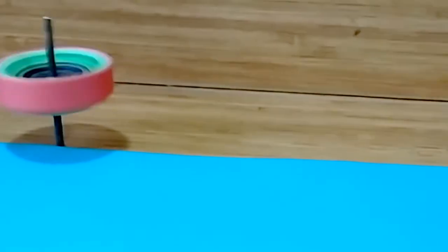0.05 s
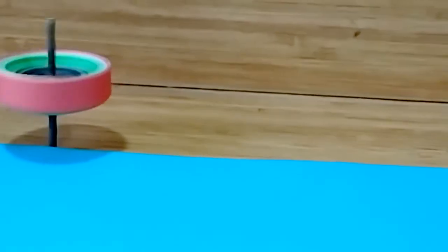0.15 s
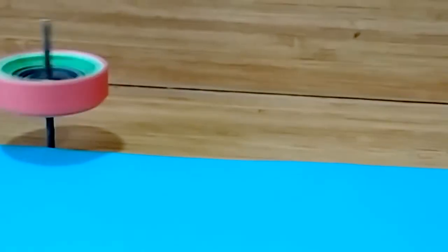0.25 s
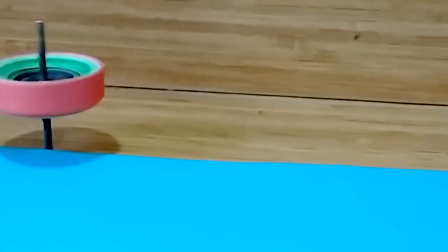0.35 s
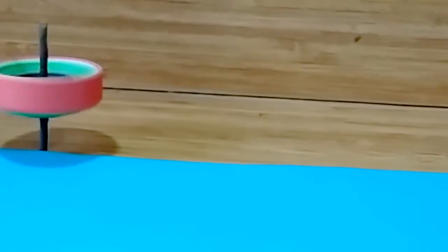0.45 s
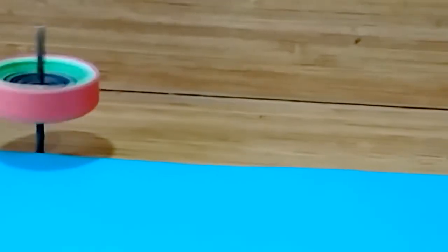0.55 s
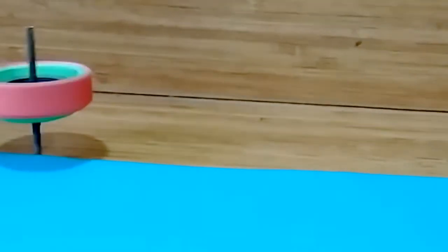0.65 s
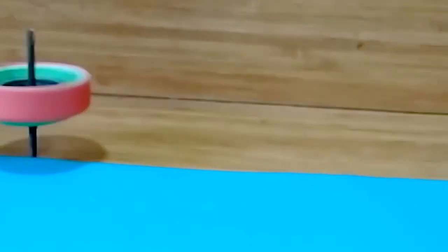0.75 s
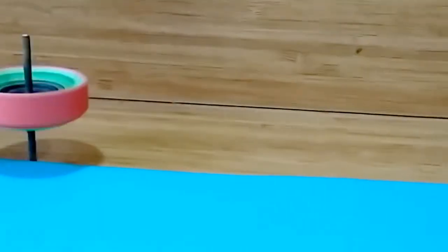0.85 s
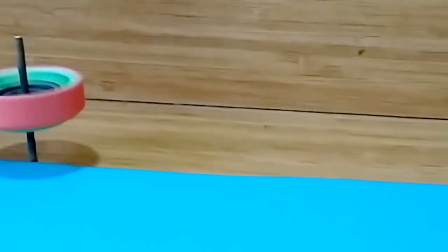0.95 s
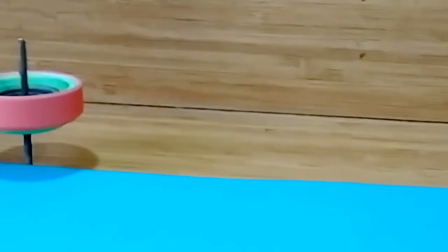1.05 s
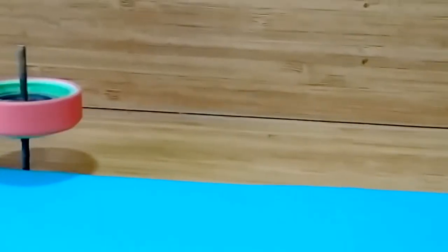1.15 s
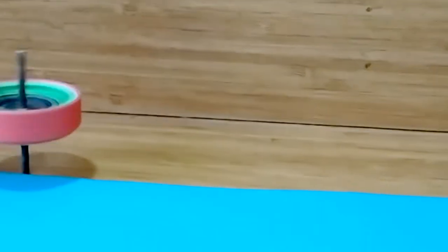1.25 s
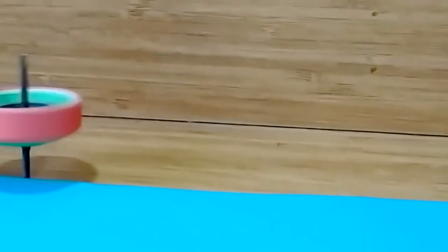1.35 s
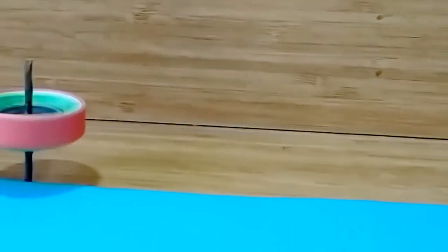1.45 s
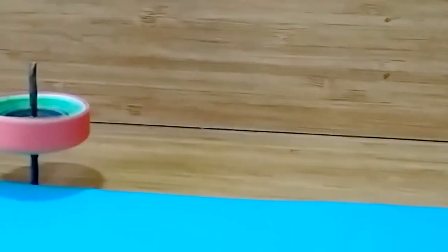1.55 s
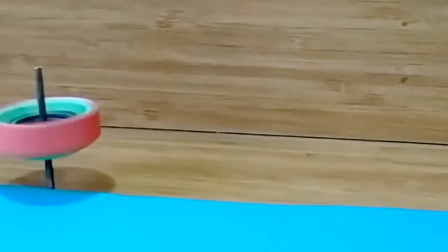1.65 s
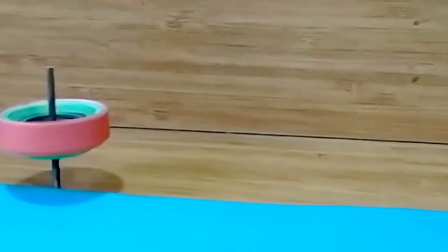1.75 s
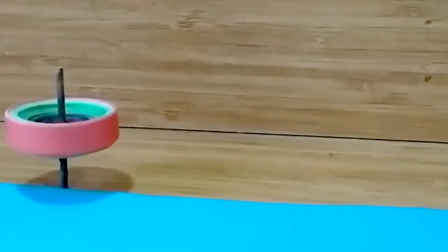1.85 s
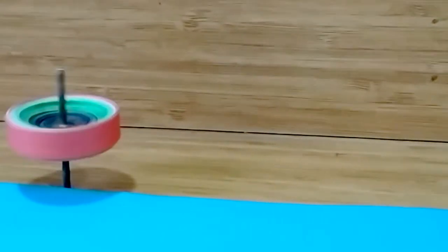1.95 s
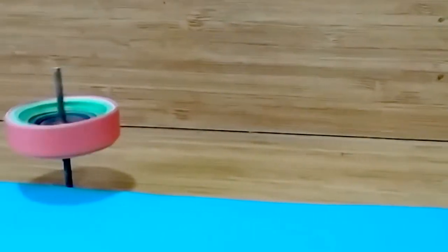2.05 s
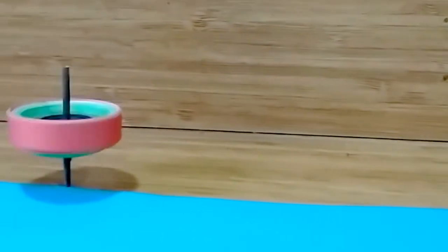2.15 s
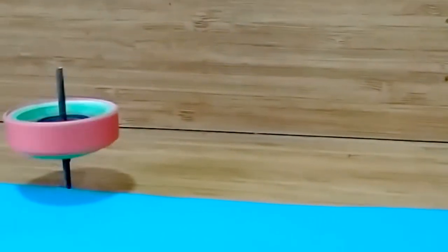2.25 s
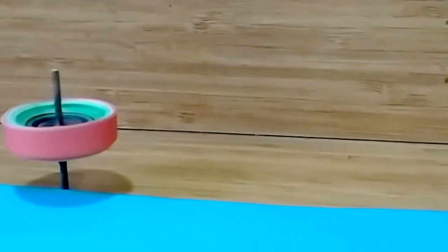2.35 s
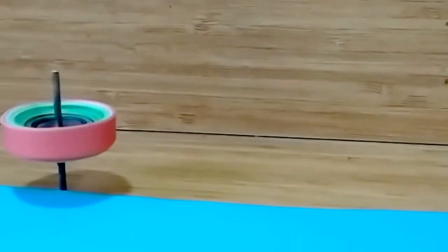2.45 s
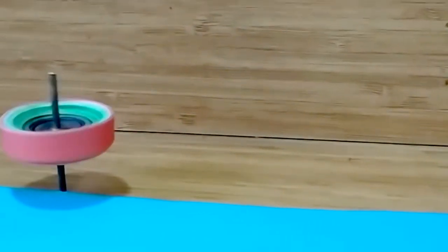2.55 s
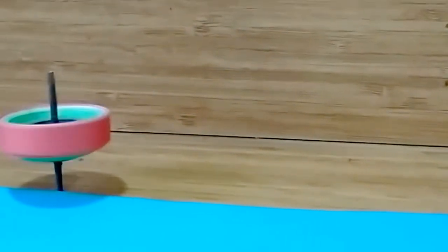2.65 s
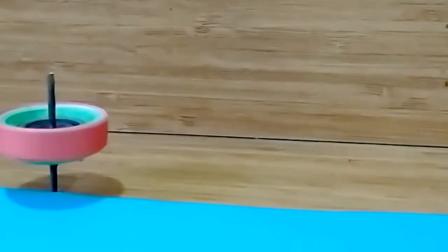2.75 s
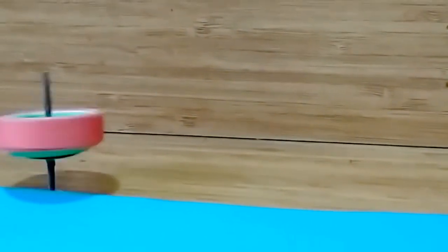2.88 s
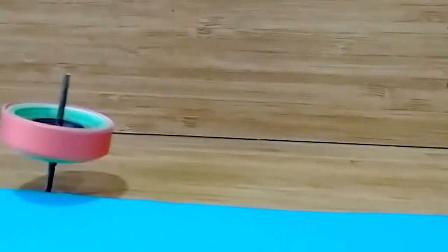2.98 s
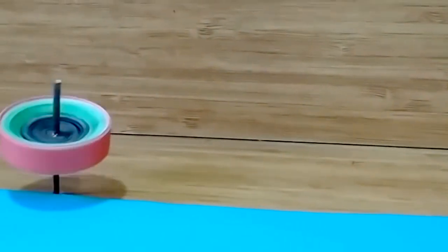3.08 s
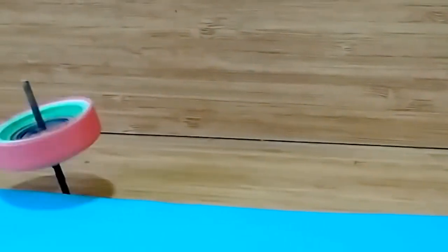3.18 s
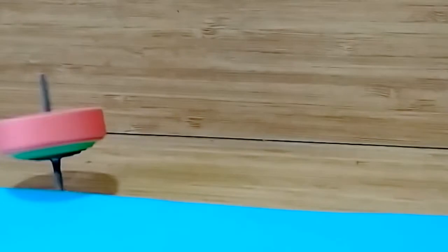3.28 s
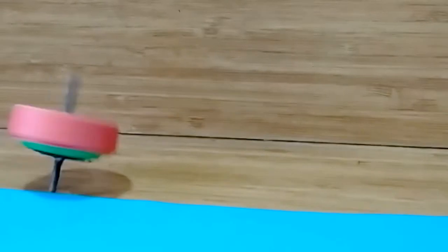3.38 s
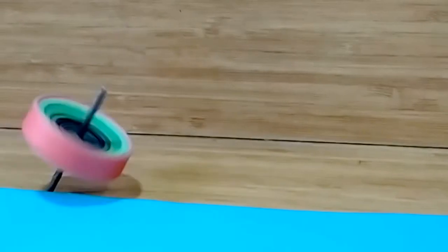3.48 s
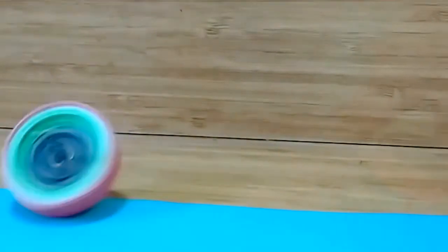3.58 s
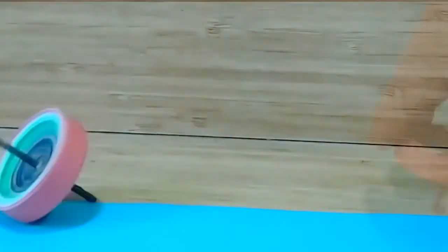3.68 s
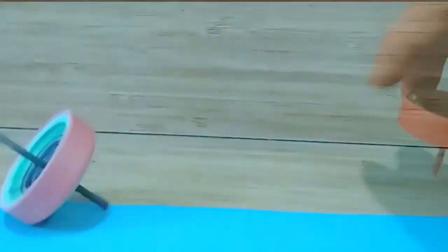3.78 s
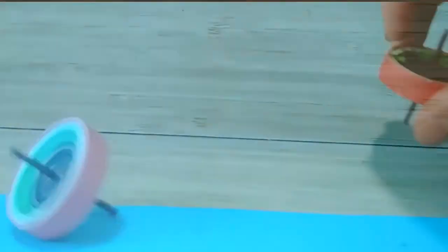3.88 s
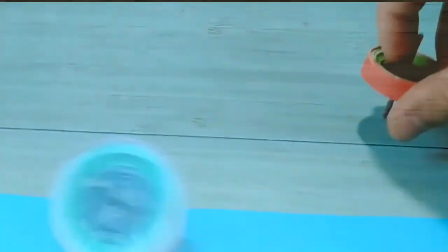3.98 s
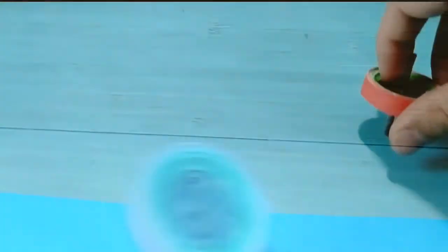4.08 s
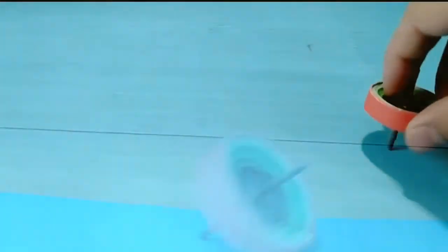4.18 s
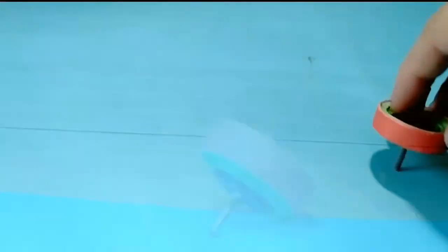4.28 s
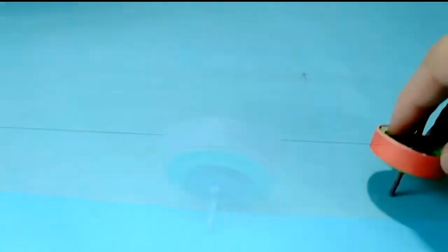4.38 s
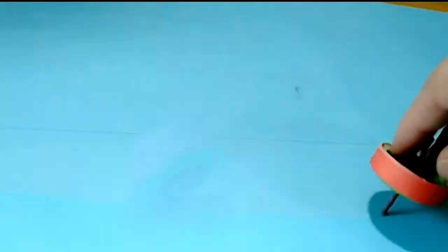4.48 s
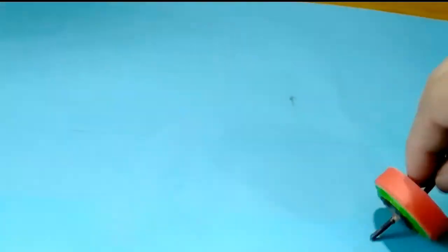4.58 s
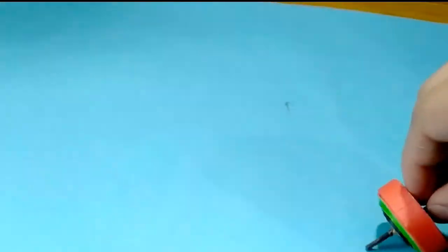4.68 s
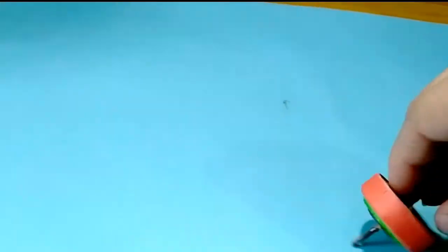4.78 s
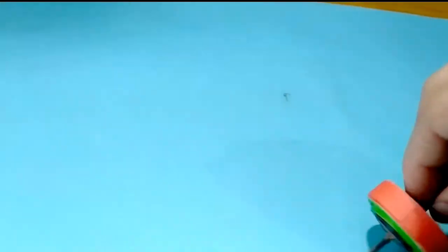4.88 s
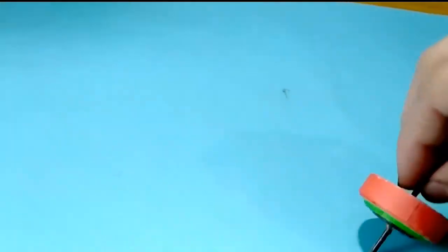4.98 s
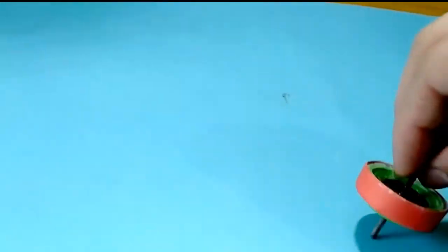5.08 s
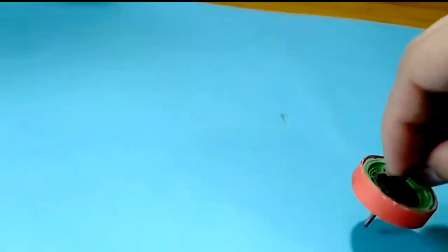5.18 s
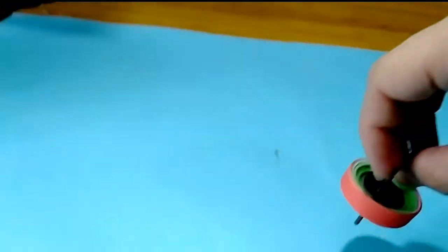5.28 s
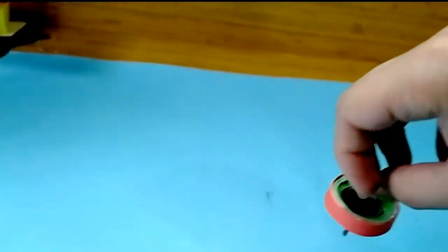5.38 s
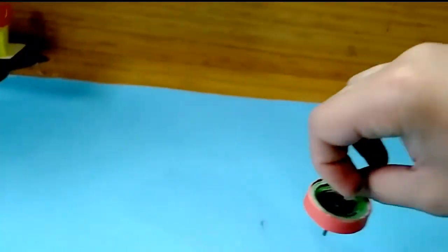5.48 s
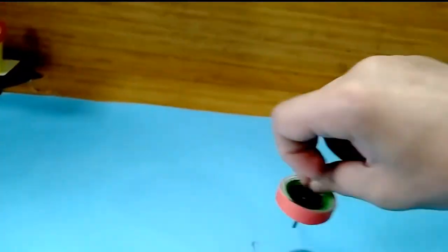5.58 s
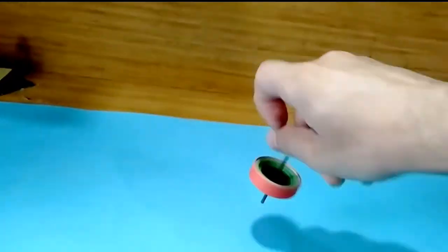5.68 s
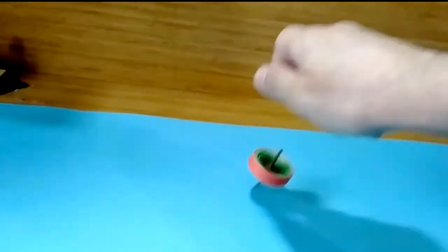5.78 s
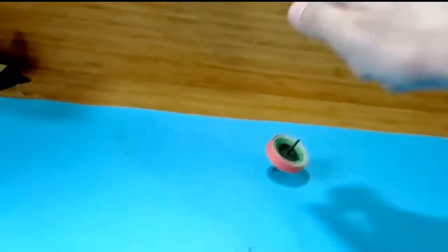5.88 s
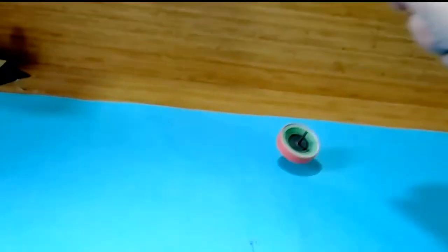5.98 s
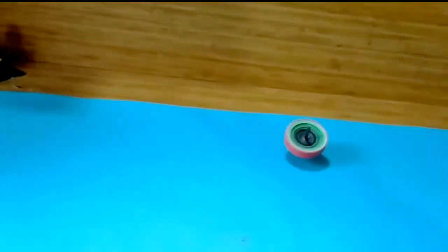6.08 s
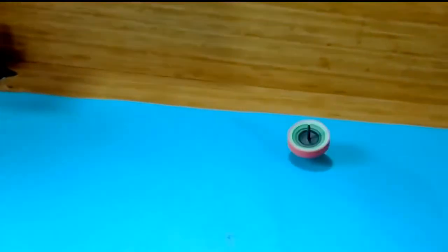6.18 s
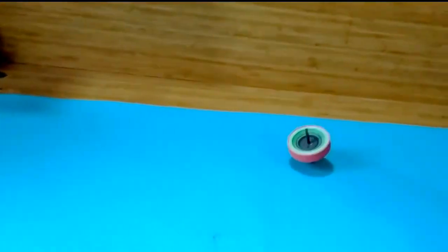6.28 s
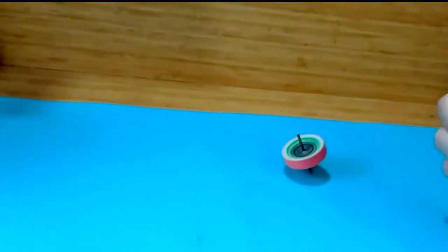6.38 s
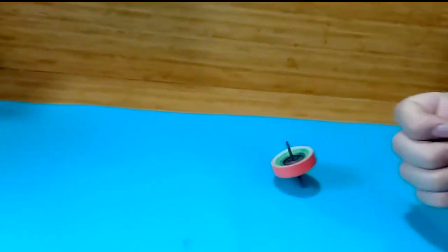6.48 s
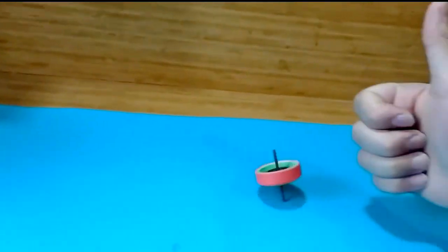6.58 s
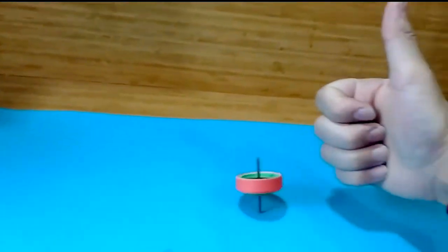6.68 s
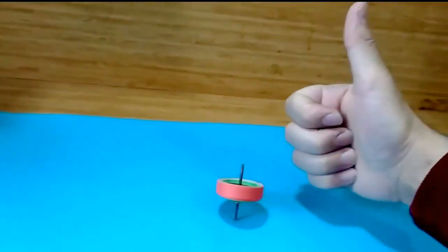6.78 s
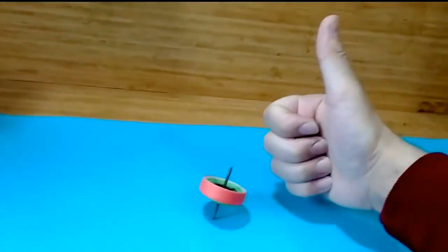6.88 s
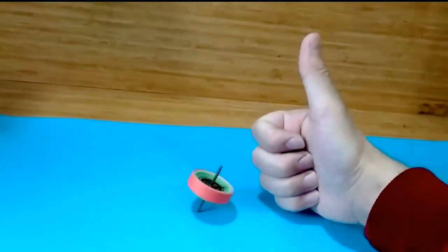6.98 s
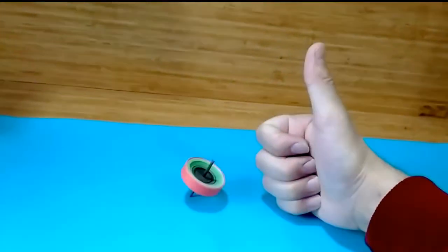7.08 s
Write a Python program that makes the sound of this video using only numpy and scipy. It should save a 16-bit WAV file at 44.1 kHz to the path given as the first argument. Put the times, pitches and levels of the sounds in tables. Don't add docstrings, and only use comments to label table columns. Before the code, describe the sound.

Close stereo pickup over low room rumble and soft hiss. A light top's tip taps paper and board, skids, rattles as it leans, and tumbles over, its rim slapping and scraping. The ambience fades into a slightly louder table setting with soft finger strokes and thuds. Then comes the loudest event, a hard woody landing with a clack, quick bounces and a low, rough buzzing spin until the end.

```python
import sys
import numpy as np
from scipy import signal
from scipy.fft import irfft, next_fast_len
from scipy.io import wavfile
from scipy.ndimage import uniform_filter1d

SR = 44100
rng = np.random.default_rng(int(sys.argv[2]) if len(sys.argv) > 2 else 0)


def voltage_ratio(level):
    return 10 ** (np.asarray(level, float) / 20)


def master(y):
    cut = np.clip(np.atleast_2d(y).T, -1, 1)
    pcm = np.round(cut * 32767)
    wavfile.write(sys.argv[1], SR, pcm.astype(np.int16))


N = 314874
TIME, LONG = np.arange(N) / SR, next_fast_len(N)
FREQ = np.arange(LONG // 2 + 1) * SR / LONG + 1


def spectrum(points):
    hz, db = np.transpose(points)
    return voltage_ratio(np.interp(np.log(FREQ), np.log(hz), db))


def unit(x):
    return x / np.sqrt(np.mean(x ** 2))


def noise(tone, ports, alike_hz=0.8):
    real, imag = rng.standard_normal((2, 2, len(FREQ)))
    mid, side = real + 1j * imag
    drift = 0.93 * (FREQ < 45)
    side = side * np.maximum(FREQ / np.hypot(FREQ, alike_hz), drift)
    tilt = np.sqrt(spectrum(ports))
    both = np.array([(mid + side) * tilt, (mid - side) / tilt])
    pair = irfft(spectrum(tone) * both, LONG)[:, :N]
    return pair / np.sqrt(np.mean(pair.mean(axis=0) ** 2))


def curve(rows, columns, edge=0.0074):
    rows = np.array(rows)
    gain = np.zeros(N)
    span = slice(int(rows[0, 0] * SR), int((rows[-1, 0] + edge) * SR))
    t = TIME[span]
    inside = np.clip(np.minimum(t - t[0], t[-1] - t) / edge, 0, 1)
    gain[span] = inside * voltage_ratio(np.interp(t, rows[:, 0], rows[:, columns].sum(axis=1)))
    return gain


def swells(rows):
    gain = np.zeros(N)
    for s, db, rise, fall in rows:
        span = slice(max(int((s - 2 * rise) * SR), 0), int((s + 2 * fall) * SR))
        t = TIME[span]
        gain[span] += voltage_ratio(db - 20 * np.maximum((s - t) / rise, (t - s) / fall))
    return gain


def bursts(rows, tail_db, tail_t60):
    env = np.zeros(N + SR)
    t = np.arange(SR // 2) / SR
    attack = np.minimum(t / 0.00079, 1)
    tail = voltage_ratio(tail_db - 60 * t / tail_t60)
    for s, db, t60 in rows:
        i = int(s * SR)
        env[i:i + len(t)] += voltage_ratio(db) * attack * (voltage_ratio(-60 * t / t60) + tail)
    return env[:N]


def flicker(rate, depth_db):
    k = int(SR / rate)
    held = np.repeat(rng.standard_normal(N // k + 1), k)
    return unit(voltage_ratio(depth_db * uniform_filter1d(held, k)[:N]))


def crackle(rate, spread_db):
    k = int(SR / rate)
    grains = np.repeat(voltage_ratio(spread_db * rng.exponential(size=N // k + 1)), k)
    return unit(uniform_filter1d(grains, k)[:N])


def soft(ms):
    n = int(ms * SR / 1000)
    return unit(uniform_filter1d(uniform_filter1d(rng.standard_normal(N), n), n))


def resonate(x, hz, width_hz):
    return unit(signal.lfilter(*signal.iirpeak(hz, hz / width_hz, SR), x))


def pushes(rows, rough):
    force = np.zeros(N + SR)
    for (s, db, ms), grit in zip(rows, rng.standard_normal((300, 800))):
        i, n = int(s * SR), int(np.clip(ms * SR / 1000, 3, 400))
        force[i:i + n] += voltage_ratio(db) * np.sin(np.pi * np.arange(n) / n) * np.pi / 2 / n
        chatter = uniform_filter1d(grit, n) / np.sqrt(n) * np.exp(-np.arange(len(grit)) / 250)
        force[i:i + len(grit)] += voltage_ratio(db) * rough * chatter
    return force[:N]


def ring(force, modes, low_hz, dense_db, dense_hz, dense_t60):
    hz, db, t60, lead = np.array(modes).T[:, :, None]
    t = np.arange(SR // 2) / SR
    decay = voltage_ratio(db - 60 * t / t60) * (-1) ** np.arange(len(hz))[:, None]
    angle = 2 * np.pi * hz * t
    echo = np.array([np.sum(decay * np.sin(angle + side * lead), axis=0) for side in (.5, -.5)])
    band = signal.butter(2, [dense_hz / 4, dense_hz], "band", fs=SR, output="sos")
    wash = signal.sosfilt(band, rng.standard_normal((2, len(t))))
    echo += unit(wash) * voltage_ratio(dense_db - 60 * t / dense_t60)
    force = signal.sosfilt(signal.butter(2, low_hz, "high", fs=SR, output="sos"), force)
    return signal.oaconvolve(force[None], echo, axes=1)[:, :N]


# frequency in Hz, left minus right in dB.
BOARD_PORTS = [(300, -0.3), (2000, 0), (5000, 2.5), (8200, 8.5), (9500, 1.5), (11500, 4.5)]
TABLE_PORTS = [(300, 0.5), (2000, -4.5), (5000, -0.5), (8200, -3), (9500, -0.5), (12500, 5.5)]
# frequency in Hz, level in dB.
BOARD_ROOM = [(12, -28), (20, 0.5), (33, -3.5), (48, -4), (96, -13), (150, -13), (590, -23.5), (825, -31),
              (1710, -34), (3070, -39), (6010, -42), (8410, -35), (9950, -42), (10800, -47.5), (16000, -56)]
TABLE_ROOM = [(12, -23.5), (20, -4.5), (33, -5), (61, -2.5), (120, -22), (168, -17), (357, -25),
              (388, -25.5), (422, -25.5), (718, -29), (802, -34), (6910, -41.5), (10500, -33.5),
              (16000, -47)]
FADE_S = (4.13, 5.08)


def room():
    fade = np.interp(TIME, FADE_S, [0, 1])
    swell = flicker(rate=4.8, depth_db=2.44)
    first = noise(BOARD_ROOM, BOARD_PORTS, alike_hz=230) * voltage_ratio(-71) * (1 - fade)
    second = noise(TABLE_ROOM, TABLE_PORTS, alike_hz=200) * voltage_ratio(-64.5) * fade
    return swell * (first + second)


# start in seconds, tick on the paper in dB, knock in the board in dB.
TAPS = [(0.0732, -67, -78), (0.154, -71, -80), (0.2548, -64.5, -75), (0.3205, -49.5, -50.5),
        (0.3968, -54, -60.5), (0.477, -63, -71), (0.541, -53, -61), (0.624, -64, -80), (0.6586, -71, -54.5),
        (0.8036, -71, -74), (0.844, -54, -54.5), (0.9241, -53, -56), (0.9999, -52.5, -56.5),
        (1.078, -56, -71), (1.1541, -50.5, -50.5), (1.228, -50.5, -51.5), (1.305, -51.5, -70),
        (1.5454, -72, -61.5), (1.8609, -63, -57), (1.933, -54.5, -78), (2.017, -59.5, -57.5),
        (2.3363, -58, -67), (2.4962, -51.5, -66), (2.587, -68, -82), (2.8334, -58.5, -63),
        (3.0755, -57, -75), (3.153, -67, -67), (3.254, -62.5, -68), (3.5668, -62, -74)]
# start in seconds, peak in dB.
SKIDS = [
    (2.244, -57.5),
    (2.9863, -57),
    (3.4635, -60),
]
# frequency in Hz, level in dB.
TICK_TONE = [(530, -56), (900, -15.5), (2280, -8), (3320, -14.5), (4110, -3), (4570, -10.5), (9040, 1),
             (12000, -24), (12900, -23), (15000, -45)]


def tip_ticks():
    catches = [(s, db, 0.045 + 0.004 * s) for s, db, _ in TAPS]
    catches += [(s, db, 0.25) for s, db in SKIDS]
    return bursts(catches, tail_db=-16, tail_t60=0.18) * noise(TICK_TONE, BOARD_PORTS) * voltage_ratio(-9)


# time in seconds, level in dB.
UPRIGHT = [(0, -79), (0.3, -90), (0.45, -75.5), (1.26, -72), (1.5, -79), (2.2, -73), (2.28, -68.5),
           (2.7, -89), (2.98, -79)]
# time in seconds, level in dB.
LEANING = [(2.98, -64), (3.13, -65), (3.17, -59), (3.22, -63), (3.27, -57.5), (3.305, -70), (3.39, -54.5),
           (3.44, -60.5), (3.49, -56), (3.555, -65), (3.59, -55.5), (3.71, -51.5), (3.785, -59.5),
           (3.82, -55), (3.91, -55), (3.96, -62), (4.06, -58.5), (4.17, -76), (4.5, -79)]
# start in seconds, peak in dB, contact in ms.
JOLTS = [(1.187, -58, 1), (1.314, -38, 0.78), (1.898, -49.5, 0.85), (2.077, -51, 0.82), (2.251, -44, 0.77),
         (2.459, -64, 0.35), (2.867, -57.5, 0.59), (2.991, -44.5, 0.17), (3.156, -43, 0.68),
         (3.262, -51.5, 0.44), (3.373, -47.5, 0.49), (3.472, -44, 0.88), (3.572, -44, 0.76),
         (3.867, -37.5, 0.72), (3.889, -37, 0.64), (3.991, -43, 0.77), (4.035, -33.5, 0.58),
         (4.209, -44, 0.81), (4.315, -51, 1.16)]
# peak time in seconds, peak in dB, rise in s, fall in s.
ROLL = [
    (4.054, -51.5, 0.42, 0.27),
]
# frequency in Hz, level in dB, t60 in s, phase lead of the left port in rad.
BOARD = [(85, -26, 0.37, -1.3), (119, -17.5, .2, 1.6), (168.5, -11, 0.095, 1.1), (233.8, -5, 0.18, 0),
         (296.4, -2.5, 0.23, -1.5), (345.3, -5, 0.099, -1), (421.6, -12.5, 0.2, 0.7),
         (460, -11.5, 0.14, 1.4), (526, -6.5, 0.076, 1.5), (615.3, -7.5, 0.1, 0.67), (728, -4, 0.066, 1.5),
         (792, -14.5, 0.057, 8.5), (1314, -12, .06, -2), (2150, -28, 0.042, 13)]


def leaning_chatter():
    jolts = [(s, 0, 0.21) for s, _, _ in JOLTS]
    press = curve(LEANING, [1]) * (voltage_ratio(-2) + bursts(jolts, tail_db=-30, tail_t60=0.29))
    locked_hz = 296 * flicker(rate=14, depth_db=0.4)
    locked = np.sin(2 * np.pi * np.cumsum(locked_hz) / SR) * voltage_ratio(-48.5)
    loose = resonate(soft(ms=0.33), hz=288, width_hz=74) * voltage_ratio(-48)
    return (locked + loose + soft(ms=0.43) * voltage_ratio(-46.5)) * press


def board():
    upright, leaning = curve(UPRIGHT, [1]), curve(LEANING, [1])
    knock_lag_s, tap_ms = 0.00299, 0.72
    knocks = [(s + knock_lag_s, db, tap_ms) for s, _, db in TAPS] + JOLTS
    murmur = soft(ms=0.67) * flicker(rate=11, depth_db=5) * upright * voltage_ratio(-44)
    roll = upright * voltage_ratio(-14.5) + leaning * voltage_ratio(-19.5) + swells(ROLL)
    force = pushes(knocks, rough=0.55) * voltage_ratio(-10) + murmur + leaning_chatter()
    force += soft(ms=2.8) * roll * voltage_ratio(-38)
    return ring(force, BOARD, low_hz=70, dense_db=-15, dense_hz=1030, dense_t60=0.12)


# peak time in seconds, peak in dB, rise in s, fall in s.
DRAG = [
    (3.47, -71, 0.023, 0.076),
    (3.8, -69, 0.17, 0.64),
    (4.2, -74.5, 0.27, 0.34),
]
# peak time in seconds, peak in dB, rise in s, fall in s.
SCRAPE = [(1.72, -78, 0.41, 0.49), (3.762, -68, 0.13, 0.029), (3.822, -42.5, 0.012, 0.014),
          (3.862, -38.5, 0.035, 0.024), (3.9, -45, 0.018, 0.048), (3.938, -52.5, .05, .03),
          (3.965, -51.5, .05, 0.016), (3.995, -52, 0.012, 0.017), (4.125, -63, .03, .02),
          (4.142, -47.5, 0.021, 0.0073), (4.19, -58, 0.066, 0.41)]
# start in seconds, peak in dB, t60 in s.
SLAPS = [(3.715, -52, 0.19), (3.7876, -22.5, 0.037), (3.8127, -25.5, 0.052), (3.8417, -27, 0.015),
         (3.8512, -27, 0.012), (3.896, -28.5, 0.026), (3.9355, -46, 0.018), (3.9885, -31.5, 0.049),
         (4.0317, -32.5, 0.046), (4.0552, -38.5, 0.079), (4.0744, -45, 0.098), (4.0976, -47, 0.12),
         (4.164, -53, 0.061), (4.188, -59, .05)]
# frequency in Hz, level in dB.
RUB_TONE = [(290, -47.5), (500, -4.5), (690, -4.5), (1200, -4), (3100, -1), (4100, -10.5), (6000, -12.5),
            (7800, -36), (13200, -120)]
SCRAPE_TONE = [(590, -40), (1000, -50), (2280, -19), (2950, -39), (3330, -18), (3650, -28), (4440, -15.5),
               (6480, -12.5), (7500, -4), (8100, -3.5), (8940, 0), (13100, -23.5), (13700, -58.5)]


def board_paper():
    rub = curve(UPRIGHT, [1]) * voltage_ratio(-18) + curve(LEANING, [1]) * voltage_ratio(-33.5) + swells(DRAG)
    rim = swells(SCRAPE) + bursts(SLAPS, tail_db=-30, tail_t60=0.094) * voltage_ratio(-11.5)
    scrape = rim * crackle(rate=1200, spread_db=2) * noise(SCRAPE_TONE, BOARD_PORTS)
    return noise(RUB_TONE, BOARD_PORTS) * rub * voltage_ratio(-2.3) + scrape


def tones(calls):
    out = np.zeros(N)
    for s, length, first_hz, last_hz, db in calls:
        hz = np.interp(TIME, [s, s + length], [first_hz, last_hz])
        gain = np.sqrt(2) * curve([(s, db), (s + length, db)], [1])
        out += gain * np.sin(2 * np.pi * np.cumsum(hz) / SR)
    return out * flicker(rate=94, depth_db=5.5)


# start in seconds, length in s, first frequency in Hz, last in Hz, level in dB.
HOOT = [
    (2.3, 0.2, 668, 662, -79),
    (2.48, 0.035, 661, 644, -81),
]


def hoot():
    return tones(HOOT)


# peak time in seconds, hiss in dB, rise in s, fall in s, skin rub relative in dB.
STROKES = [(4.35, -60.5, 0.38, 0.057, -18), (4.576, -58.5, 0.063, 0.0076, -36),
           (4.679, -58.5, 0.16, 0.037, -2.5), (4.871, -60, 0.0091, 0.085, 3.5),
           (4.925, -55.5, 0.063, 0.019, -4), (5.006, -60.5, 0.0094, 0.011, -2.5),
           (5.1, -63.5, 0.046, 0.11, 0), (5.172, -56, 0.064, 0.02, -4.5), (5.4, -80, 0.2, 0.45, -9),
           (5.63, -69.5, 0.47, 0.31, -8.5), (5.73, -57.5, 0.19, 0.046, -21),
           (5.744, -56.5, 0.021, 0.023, -3), (5.82, -60.5, 0.12, 0.072, -12.5),
           (5.965, -67.5, 0.025, 0.055, 7.5), (7.098, -65, 0.069, 0.012, -28)]
# time in seconds, level in dB.
AIR = [(5.99, -79), (6.146, -64.5), (6.7, -61.5), (7.05, -62.5), (7.14, -63)]
# start in seconds, peak in dB, t60 in s.
SNAPS = [(4.6768, -66, 0.054), (4.8706, -50, 0.088), (4.916, -35.5, 0.012), (4.927, -52, 0.019),
         (4.9965, -52, 0.043), (5.735, -41, 0.066), (5.742, -33, 0.032), (5.8391, -23.5, 0.035),
         (5.9171, -25, 0.029), (5.9354, -34.5, 0.065), (5.9487, -44, 0.027), (7.0968, -48, 0.03)]
# frequency in Hz, level in dB.
HISS_TONE = [(2350, -61), (4000, -4.5), (4390, -9.5), (6820, -7), (10500, 3), (12900, -10), (14800, -13),
             (16000, -28)]


def table_paper():
    grain = crackle(rate=710, spread_db=2)
    air = curve(AIR, [1], edge=.002) * flicker(rate=15, depth_db=-0.5)
    hiss = swells(row[:4] for row in STROKES) + air
    rub = swells((s, db + skin_db, rise, fall) for s, db, rise, fall, skin_db in STROKES)
    rub += air * voltage_ratio(-12) + curve(WHIRR, [1]) * voltage_ratio(-31)
    snaps = bursts(SNAPS, tail_db=-28, tail_t60=0.41) * voltage_ratio(-8.5)
    paper = (snaps + hiss * grain * voltage_ratio(-5.5)) * noise(HISS_TONE, TABLE_PORTS)
    catch = flicker(rate=90, depth_db=2) * crackle(rate=700, spread_db=2.5)
    return paper + noise(RUB_TONE, TABLE_PORTS, alike_hz=500) * rub * catch * voltage_ratio(-1.6)


# start in seconds, peak in dB, contact in ms.
THUDS = [(4.439, -52, 1.55), (4.598, -71, 1.7), (4.626, -53, 1.07), (4.646, -52, 1.4), (4.677, -38, 0.69),
         (4.808, -68, 1.5), (4.855, -46.5, 1.8), (4.878, -46.5, 1), (4.916, -37, 1.32), (5.488, -63, 1.2)]
# peak time in seconds, peak in dB, rise in s, fall in s.
SHIFTS = [(4.42, -63.5, 0.063, .3), (4.71, -53, 0.14, 0.076), (4.926, -49, 0.068, 0.077),
          (5.0, -68, 0.069, .12), (5.17, -69, 0.24, 0.11), (5.45, -78, .4, 0.32), (5.745, -68, 0.14, .2),
          (6.97, -62.5, .03, 0.13), (7.14, -68, 0.17, .1)]
# frequency in Hz, level in dB, t60 in s, phase lead of the left port in rad.
TABLE = [(115.2, -11.5, 0.21, 0.53), (161, -7, 0.19, 0.05), (224.4, -9, 0.1, 0.4), (284, -3.5, 0.12, -0.44),
         (322.8, -3.5, 0.1, -1.1), (386, -3.5, 0.11, -1.5), (469, -6, 0.082, -0.5), (518, -4, 0.054, 1),
         (581.6, -6, 0.1, 1.2), (645, -9.5, 0.079, 0.5), (740, -4.5, 0.045, 1.74), (793, -12, 0.18, 2.5),
         (885.6, 3, 0.071, 1.53), (1012, -20, 0.24, 3.5), (1100, -32, 0.31, 5), (1310, -12, 0.079, 11),
         (1426, -19, 0.045, 5.5), (2500, -24, 0.033, 21.5)]


def table():
    force = pushes(THUDS, rough=0.2) * voltage_ratio(-7) + soft(ms=0.9) * swells(SHIFTS) * voltage_ratio(-43)
    return ring(force + whirr(), TABLE, low_hz=95.4, dense_db=-15, dense_hz=1200, dense_t60=0.16)


# start in seconds, peak in dB, t60 in s.
CLACKS = [
    (5.8407, -13, 0.017),
    (5.9202, -44, 0.029),
]
# frequency in Hz, level in dB.
CLACK_TONE = [(900, -28.5), (1300, -4.5), (1700, -24), (2400, -9.5), (2900, -7), (3200, -9), (3750, -14.5),
              (4500, -28.5), (7000, -21.5), (10000, -53)]


def clack():
    return bursts(CLACKS, tail_db=-18, tail_t60=0.29) * noise(CLACK_TONE, TABLE_PORTS) * voltage_ratio(-8.5)


# start in seconds, peak in dB, contact in ms.
BLOWS = [
    (5.8415, -9, 0.18),
    (5.865, -22, 1),
    (5.887, -20, .6),
    (5.923, -15, 0.43),
    (5.938, -31, 0.44),
    (5.967, -27, 0.99),
]
# frequency in Hz, level in dB, t60 in s, phase lead of the left port in rad.
LANDING = [(126, -10, 0.21, 0.2), (161.6, -6, 0.11, 0.96), (228, -5, 0.083, -0.2), (298, -3.5, .06, -0.4),
           (391, -7, 0.057, -1.4), (526, -4.5, 0.12, 1), (576, -8, 0.12, 1.1), (681, -6, 0.067, 1.1),
           (750, -2, 0.088, 1.5), (891, 0, 0.11, 1.03), (1013, -7, .1, 2), (1093, -9.5, 0.15, 2.1),
           (1257, -8, 0.14, 2.5), (1432, -15, .06, 1)]
SPINDLE = [(2320, -20.5, .03, 1.2), (2873, -5, 0.027, 1), (3120, 3.5, 0.016, 1.4), (3275, -8.5, .05, 1.1),
           (3600, -10, 0.031, 1.5)]


def landing():
    force = pushes(BLOWS, rough=0.035) * voltage_ratio(-7.5)
    boom = ring(force, LANDING, low_hz=90.4, dense_db=-20, dense_hz=1280, dense_t60=0.15)
    spindle = ring(force, SPINDLE, low_hz=900, dense_db=-18, dense_hz=3900, dense_t60=0.11) * voltage_ratio(3)
    pan_db = -10
    return boom + spindle * voltage_ratio(np.array([[.5], [-.5]]) * pan_db)


# time in seconds, pressure in dB, bump relative to it in dB.
WHIRR = [(5.96, -43.5, 1), (6.05, -46.5, -1.5), (6.13, -42, 0), (6.2, -44, -6.5), (6.27, -44, 0.5),
         (6.33, -51, -6), (6.36, -54, -10), (6.39, -50.5, 4), (6.42, -69, -6), (6.45, -46, 0.5),
         (6.49, -58, -13), (6.55, -47, -10), (6.65, -46.5, -2), (6.76, -43.5, 1.5), (6.89, -46.5, .1),
         (6.935, -57.5, -5)]


def whirr():
    bump_s = 6.756
    spin_hz, sag_hz_per_s = 32.21, 1.2
    turn = np.cumsum(spin_hz - sag_hz_per_s * (TIME - bump_s)) / SR
    turn -= turn[int(bump_s * SR)]
    near = slice(int(WHIRR[0][0] * SR), N)
    ride = np.zeros(N)
    for lobes, phase in zip(np.arange(3, 30), 2 * np.pi * rng.random(27)):
        ride[near] += np.sin(2 * np.pi * lobes * turn[near] + phase) / (1 + (lobes / 9.6) ** 2)
    wraps = np.flatnonzero(np.diff(np.floor(turn)))
    size_db = 1.5 * rng.standard_normal(300)[:len(wraps)]
    contact_ms = np.full(len(wraps), 0.44)
    bumps = pushes(np.transpose([TIME[wraps], size_db, contact_ms]), rough=0.07)
    rolling = ride * voltage_ratio(-47.5) + soft(ms=0.97) * voltage_ratio(-47.5)
    return bumps * voltage_ratio(-2) * curve(WHIRR, [1, 2]) + rolling * curve(WHIRR, [1])


# start in seconds, length in s, first frequency in Hz, last in Hz, level in dB.
BIRD = [
    (6.135, 0.11, 8350, 8900, -69),
    (6.3, 0.078, 9000, 8600, -76),
]


def bird():
    return tones(BIRD)


def scene():
    first_top = tip_ticks() + board() + board_paper()
    second_top = table_paper() + table() + clack() + landing()
    return room() + first_top + hoot() + second_top + bird()


def top_cut(x):
    return signal.sosfilt(signal.butter(12, 16480, fs=SR, output="sos"), x)


def record(dry):
    thin = signal.sosfilt(signal.cheby2(10, 16, 15750, fs=SR, output="sos"), dry)
    return top_cut(thin)


dry = scene()
out = record(dry)
master(out)
```